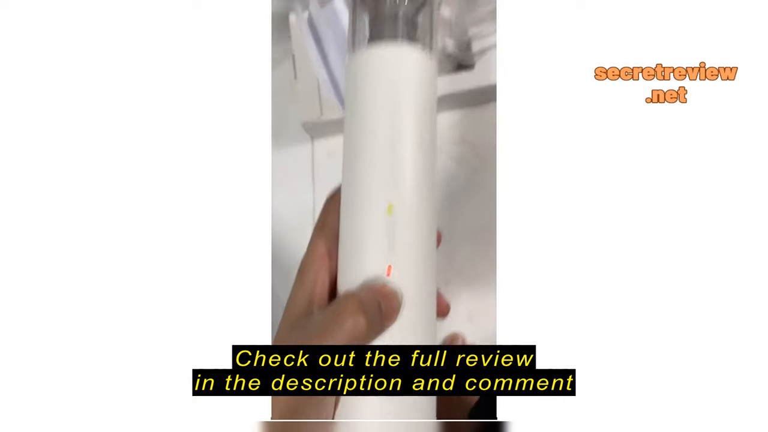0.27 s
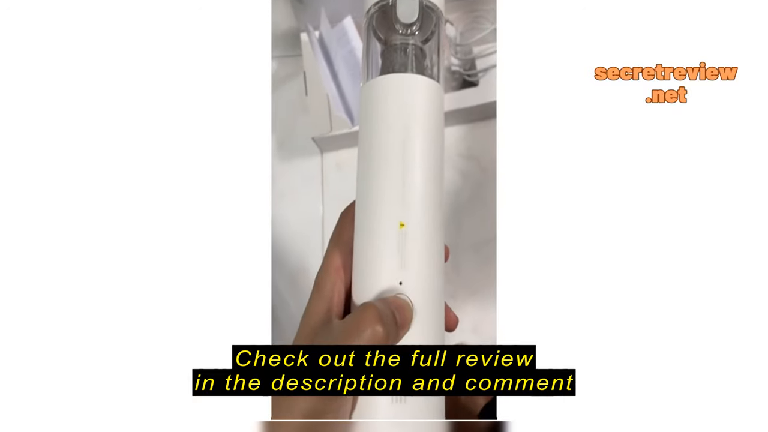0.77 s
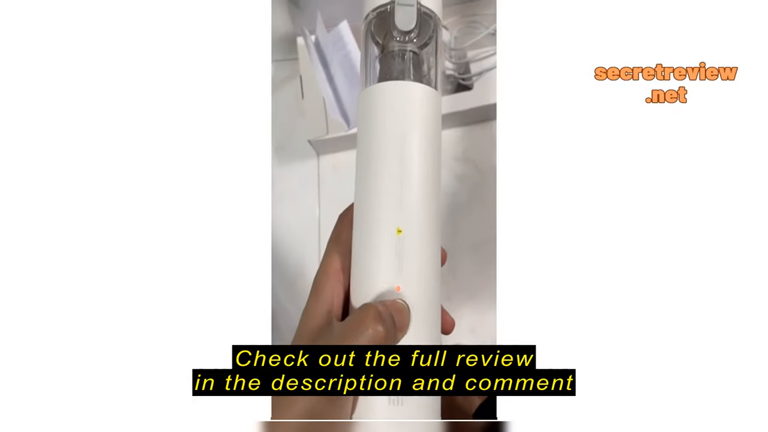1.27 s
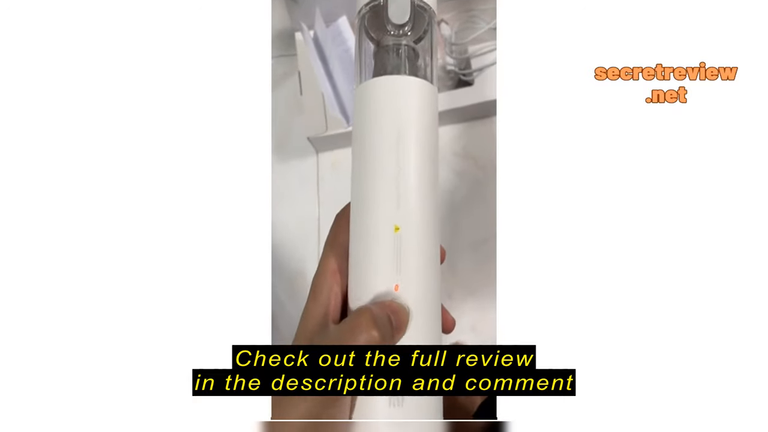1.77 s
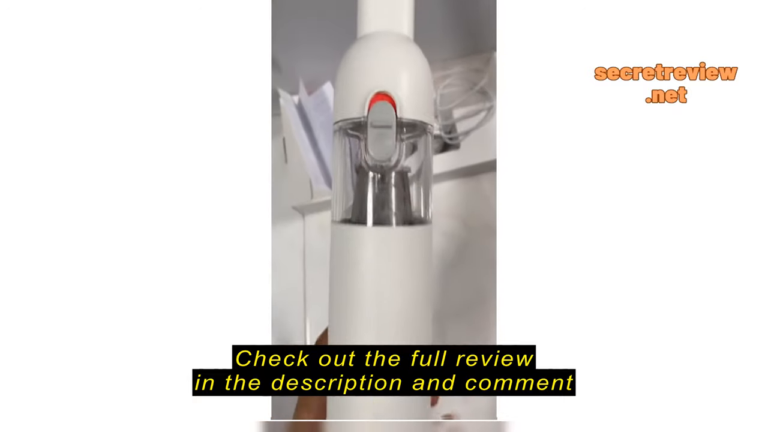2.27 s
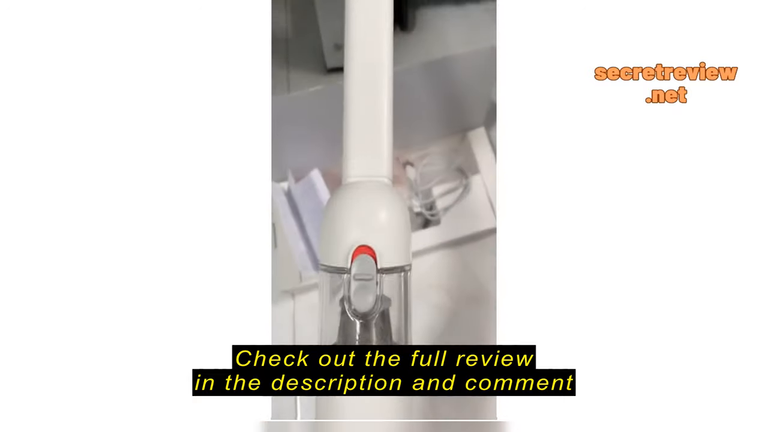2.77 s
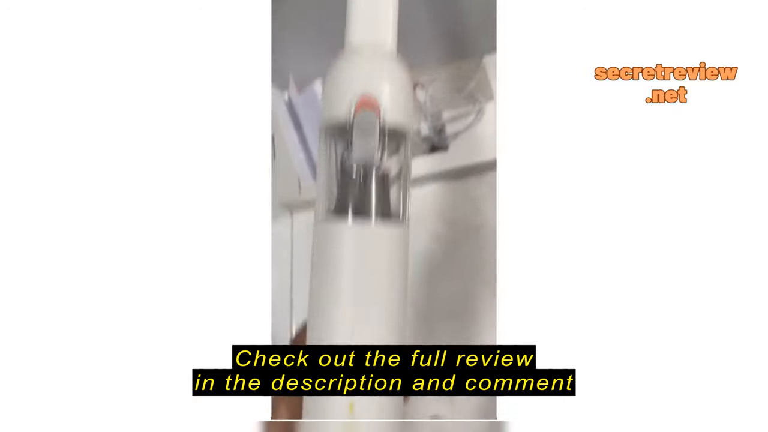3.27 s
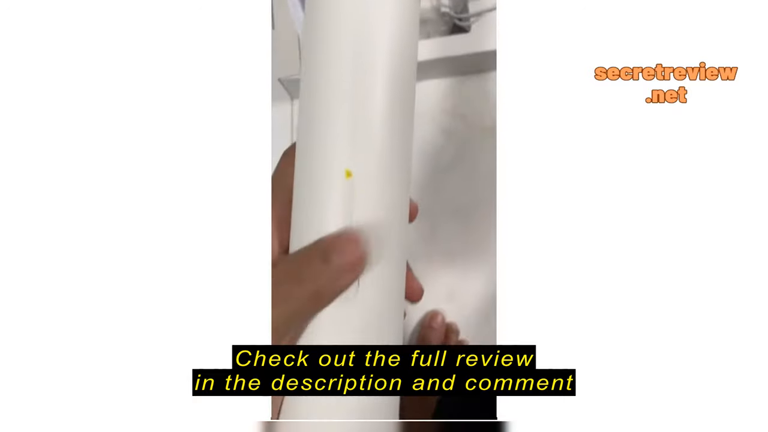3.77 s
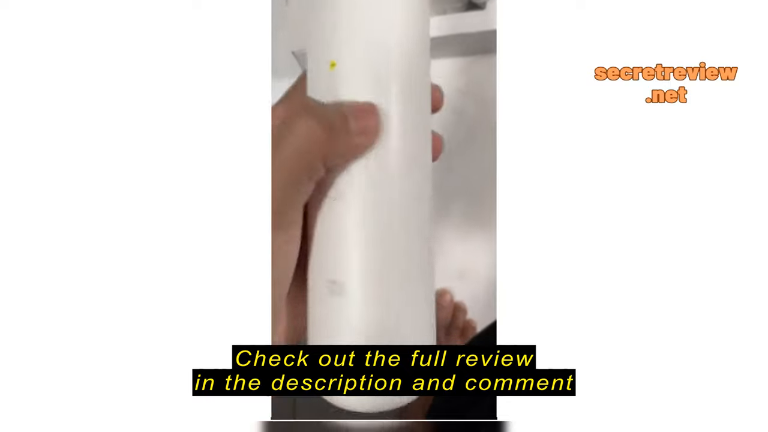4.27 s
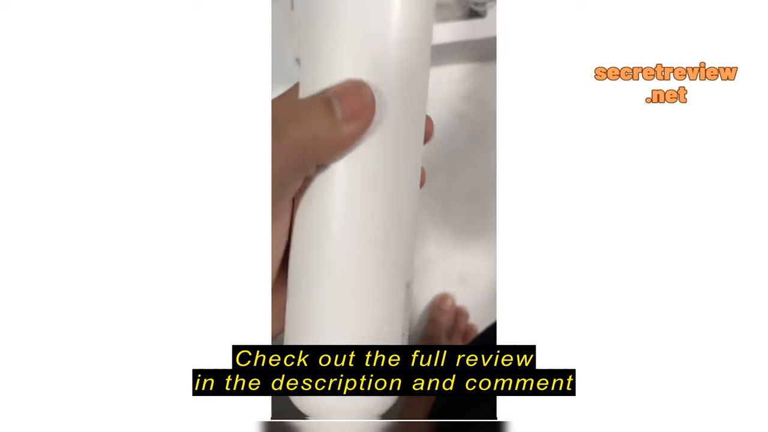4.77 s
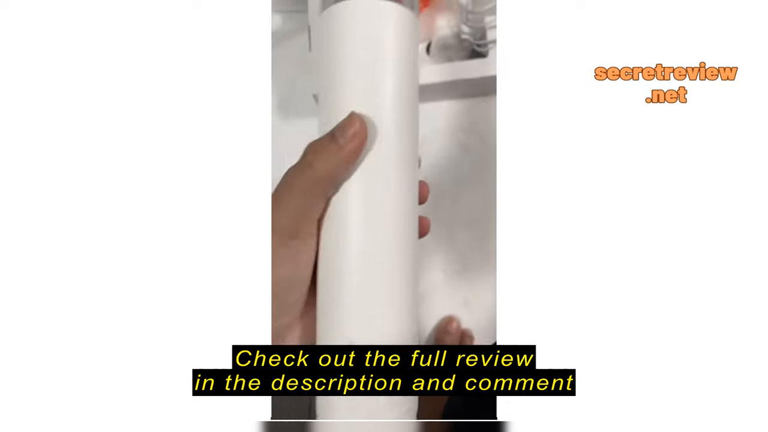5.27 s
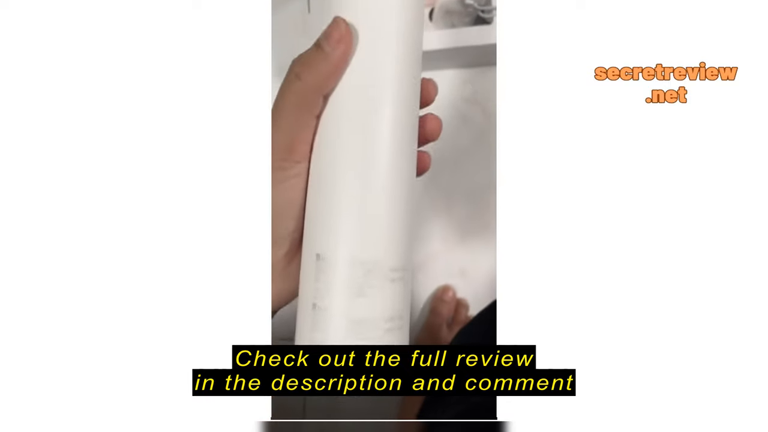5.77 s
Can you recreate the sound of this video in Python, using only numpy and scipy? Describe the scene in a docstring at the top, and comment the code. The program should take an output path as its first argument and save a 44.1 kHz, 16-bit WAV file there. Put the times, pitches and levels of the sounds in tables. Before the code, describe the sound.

A small cordless vacuum whirs up close, whines down and brakes to a clicking pause, then spins up again into a steady airy whine.

```python
"""A small cordless vacuum cleaner, held close in a quiet room, spins up: the hum sounds once a turn, nine blades
whine at nine times that rate, a bearing sings beside the second order and filtered noise rushes through the vents.
It coasts and brakes, all tones falling with the one shaft; in the pause the switch clicks twice, ringing its plastic.
It starts again with a shudder in its mount and runs on, settling to a lower cruising speed.
Later the hand shifts its grip with dull thuds, brings the tail end near and makes the vents hiss briefly."""
import sys
import numpy as np
from scipy import signal
from scipy.fft import rfft, irfft
from scipy.io import wavfile
from scipy.ndimage import uniform_filter1d

SR = 44100
rng = np.random.default_rng(int(sys.argv[2]) if len(sys.argv) > 2 else 0)


def output_pcm(signal):
    """Save a mono or channel-first signal as 16-bit PCM at the path in sys.argv[1].

    Samples are clipped to [-1, 1] before scaling.
    """
    pcm = np.clip(np.atleast_2d(signal).T, -1, 1) * 32767
    wavfile.write(sys.argv[1], SR, np.round(pcm).astype(np.int16))


N = 265834
HOP = 128  # samples between noise frames
TIME = np.arange(N) / SR
FRAMES = np.arange(N // HOP + 5) * HOP / SR  # frame times, s
BINS = np.fft.rfftfreq(4 * HOP, 1 / SR)  # frame frequencies, Hz
SPECTRUM_HZ = np.fft.rfftfreq(N, 1 / SR)
BLADES = 9
FULL_HZ = 900  # full speed, turns per second: the reference for levels


def amp(db):
    """Level definition: 20 dB is a factor of ten in amplitude."""
    return 10 ** (np.asarray(db) / 20)


def curve(rows, t, axis=1):
    """Linear interpolation: one column of a timed table, joined by straight lines."""
    rows = np.array(rows)
    return np.interp(t, rows[:, 0], rows[:, axis])


def read(points, hz):
    """Spectral envelope: values joined by straight lines over logarithmic frequency."""
    f, value = np.transpose(points)
    return np.interp(np.log(hz + 1), np.log(f), value)


def peak(hz, centre_hz, width_hz):
    """Simple resonance: gain 1 at its centre, 3 dB down at the edges of its width."""
    return 1 / np.hypot(1, 2 * (hz - centre_hz) / width_hz)


def lift(resonances, hz):
    """Resonance response: the decibels that a set of modes adds at a frequency."""
    return sum(db * peak(hz, centre, width) ** 2 for centre, width, db in resonances)


def drift(rate_hz):
    """Low-pass random fluctuation: slow chance of rms 1."""
    x = irfft(rfft(rng.standard_normal(N)) / (1 + (SPECTRUM_HZ / rate_hz) ** 2), N)
    return x / x.std()


def noise(density):
    """Time-varying spectral density: noise with this amplitude per root Hz, frames by bins."""
    z = rng.standard_normal((len(FRAMES), len(BINS), 2)) @ [1, 1j]
    scale = np.sqrt(SR * 3 / (8 * HOP))
    _, x = signal.istft(scale * (z * density).T, nperseg=4 * HOP, noverlap=3 * HOP)
    return x[:N]


def steady(gain_at):
    """Stationary spectral density: noise whose amplitude per root Hz is a function of frequency."""
    spectrum = rfft(rng.standard_normal(N)) * gain_at(SPECTRUM_HZ)
    return irfft(spectrum, N) * np.sqrt(SR / 2)


def swells(rows):
    """Gaussian envelope: a bell-shaped rise and fall for each row, its length one standard deviation."""
    return sum(amp(db) * np.exp(-((TIME - s) / length) ** 2 / 2) for s, length, db in rows)


def octaves(speed):
    """Logarithmic speed: doublings counted from full speed."""
    return np.log2(np.maximum(speed, 1) / FULL_HZ)


# the controller follows an S-shaped ramp, which it joins a little way up
RAMP_SHAPE, RAMP_LEAD_S = 1.9, .128


def ramp(start_s, length_s):
    """Stretched-exponential approach: an S-shaped rise from 0 to 1."""
    return 1 - np.exp(-(np.maximum(TIME - start_s, 0) / length_s) ** RAMP_SHAPE)


# time constants without power: slow when coasting, fast under the brake
COAST_S, BRAKE_S = .733, .078
# in a long run the speed settles to a lower cruising value
SAG_FROM_S, SAG_S, SAG_HZ = 2.88, .905, 65.7
# runs of the motor: switch-on t/s, top speed before sag f/Hz, ramp time t/s, power cut t/s, brake on t/s
MOTOR_RUNS = [(-.17, 939, .512, .877, 1.338), (1.77, 936, .5, np.inf, np.inf)]


def shaft_speed():
    """Exponential decay of rotation: runs ramp up, coast unpowered and brake; turns per second."""
    speed = -SAG_HZ * ramp(SAG_FROM_S, SAG_S)
    for on_s, top_hz, ramp_s, cut_s, brake_s in MOTOR_RUNS:
        slowing = np.maximum(TIME - cut_s, 0) / COAST_S + np.maximum(TIME - brake_s, 0) / BRAKE_S
        rise = top_hz * ramp(on_s - RAMP_LEAD_S, ramp_s)
        speed = speed + (TIME > on_s) * rise * np.exp(-slowing)
    return uniform_filter1d(speed, size=1600, mode="nearest")


RELAX_S = 0.19  # time for the air stream to relax or pick up again


def coasting():
    """First-order relaxation: 0 while the motor is powered, easing to 1 when it is not."""
    powered = sum(1.0 * (TIME > on_s) * (TIME < cut_s) for on_s, _, _, cut_s, _ in MOTOR_RUNS)
    step = 1 / (RELAX_S * SR)
    return signal.lfilter([step], [1, step - 1], 1 - powered)


STALL_HZ, STALL_STEEPNESS = 302, 3.43  # below this speed the fan hardly moves air
RUSH_AWAY_DB, RUSH_NEAR_DB = -0.52, 1.63  # stream gain with the tail end away and near
RUSH_DB_PER_OCTAVE, COAST_RUSH_DB = 3.5, -2.5  # growth per doubling of speed; change without power


def flow(speed, near):
    """Fan law with stall: the air stream sets in above the stall speed, then grows gently."""
    pumping = 1 / (1 + (STALL_HZ / np.maximum(speed, 1)) ** STALL_STEEPNESS)
    full_db = RUSH_AWAY_DB + near * (RUSH_NEAR_DB - RUSH_AWAY_DB)
    return pumping * amp(full_db + RUSH_DB_PER_OCTAVE * octaves(speed) + COAST_RUSH_DB * coasting())


# gain for a doubling of the speed; change of the weaker tones without power
HUM_DB_PER_OCTAVE, WHINE_DB_PER_OCTAVE, COAST_TONES_DB = 20.5, 16, -4
# hum as the hand turns the body, at full speed and off resonance: t/s, rms level/dB
HUM_TURNING = [(.6, -41), (2.28, -41.5), (3, -38), (3.4, -42), (3.8, -43), (4.68, -37), (5.1, -38),
               (5.39, -35.5), (5.85, -38.7), (6, -46)]
# whine likewise, more sharply beamed: t/s, rms level/dB
WHINE_TURNING = [(.17, -60.5), (.62, -58), (1.24, -63.6), (2.14, -56.5), (2.61, -62), (2.76, -68),
                 (3.75, -69.5), (4.09, -63), (4.29, -55), (4.75, -62.5), (5.25, -59), (5.72, -64),
                 (5.92, -59)]
# resonances of the body, swept by the hum: f/Hz, width/Hz, lift/dB
BODY_MODES = [(333, 80, 10), (447, 68, 12), (651, 55, 7), (731.6, 63, 11), (808, 15, 5.5), (848, 25, -1.5),
              (889, 50, 4)]
# resonances of the fan housing, swept by the whine: f/Hz, width/Hz, lift/dB
HOUSING_MODES = [(5550, 1090, 15.5), (6250, 250, 7), (6590, 230, -16), (7610, 230, 9.5), (8190, 585, 14.5)]
# weaker shaft and ball-bearing tones: multiple of the shaft speed
TONE_ORDERS = [2, 19 / 9, 3, 4, 44 / 9, 5, 6, 61 / 9, 7, 8, 79 / 9]
# one row per order, before flow and shell gain: rms level away/dB, rms level with tail end near/dB
TONE_LEVELS = [(-71, -70), (-71, -77), (-64.5, -81.5), (-72.5, -68), (-70, -81), (-82, -72), (-95, -94),
               (-76, -79), (-71.5, -77), (-74, -70), (-81, -85)]
# resonances of the plastic shell, cubed below: f/Hz, width before cubing/Hz, added part against the tone/dB
SHELL_MODES = [(1199, 82, 27.5), (1356, 115, 19), (1855, 112, 19), (2160, 63, -8), (2500, 86, 12),
               (2590.5, 78, 9.5), (5300, 350, 14)]
# as the body turns, it beams one tone or another at the listener: multiple of the shaft speed
BEAMED_ORDERS = [2, 2, 19 / 9, 19 / 9, 3, 4, 4]
# one row per beamed order: t/s, length/s, level of the added part against the tone/dB
BEAM_FLARES = [(2.8, 0.1, -6), (4.02, 0.14, 2), (0.69, 0.17, -1), (2.85, 0.31, -1.5), (4.08, 0.23, 6.5),
               (2.99, 0.3, 6.5), (5.88, 0.056, 6)]


def rotor(speed, near):
    """Order locking: all tones are tied to one shaft and flare as they sweep through resonances."""
    angle = 2 * np.pi * np.cumsum(speed * (1 + 0.000413 * drift(25))) / SR
    hum_db = curve(HUM_TURNING, TIME) + HUM_DB_PER_OCTAVE * octaves(speed) + lift(BODY_MODES, speed)
    out = amp(hum_db + 0.26 * drift(27)) * np.sin(angle)

    whine_db = curve(WHINE_TURNING, TIME) + WHINE_DB_PER_OCTAVE * octaves(speed)
    whine_db = whine_db + lift(HOUSING_MODES, BLADES * speed)
    # turbulence at the blade tips makes the whine flutter
    whine = amp(whine_db + 1.3 * drift(9.9)) * np.sin(BLADES * angle + 0.27 * drift(90))
    out += np.clip((speed - 380) / 180, 0, 1) * whine

    spinning = np.clip((speed - 330) / 160, 0, 1)  # the weaker tones need speed to sound
    drive = spinning * flow(speed, near) * amp(COAST_TONES_DB * coasting())
    for multiple, (away_db, near_db) in zip(TONE_ORDERS, TONE_LEVELS):
        tone_hz = multiple * speed
        shell = 1 + sum(amp(db) * peak(tone_hz, hz, width) ** 3 for hz, width, db in SHELL_MODES)
        flares = [row for beamed, row in zip(BEAMED_ORDERS, BEAM_FLARES) if beamed == multiple]
        beam = 1 + swells(flares)
        level = beam * amp(away_db + near * (near_db - away_db) + 2.93 * drift(2.2))
        # the bearing and the high orders only sing at high speed
        if multiple % 1 or multiple > 4:
            level = level * np.clip((speed - 700) / 100, 0, 1)
        out += drive * shell * level * np.sin(multiple * angle + 2 * np.pi * rng.random())
    return np.sqrt(2) * out  # rms to peak


HISS_DB_PER_OCTAVE = 15  # growth of the outlet hiss per doubling of speed
# rush with the tail end away, before flow, comb and duct: f/Hz, density level/dB per Hz
RUSH_AWAY_SPECTRUM = [(100, -94.5), (760, -88), (1250, -86.5), (1600, -88.5), (2200, -86), (3000, -85.5),
                      (3500, -96), (4200, -87.5), (5100, -94.5), (6300, -91.5), (9800, -101.8),
                      (12200, -109.4), (13800, -91), (15700, -92)]
# rush with the tail end near, likewise: f/Hz, density level/dB per Hz
RUSH_NEAR_SPECTRUM = [(100, -93), (760, -85), (1250, -83.5), (1600, -93), (2200, -87.5), (3000, -80),
                      (3500, -92), (4200, -96.5), (5100, -103), (6300, -93.5), (9800, -99.6),
                      (12200, -102.8), (13800, -95), (15700, -92.5)]
# how the cleaner is held: t/s, nearness of the tail end (0-1),
# outlet hiss at full speed before outlet and duct gain: level/dB per Hz
HOLDING_POSE = [(.1, .6, -81.5), (.8, 0.23, -82.5), (2.05, 0.52, -81.5), (2.95, 0, -84), (3.3, 0, -84),
                (4, 0.06, -86.5), (4.35, 0.31, -81.5), (4.75, 1, -85), (5.8, 0.93, -88)]
# resonances of the air duct and its slots: f/Hz, width/Hz, lift/dB
DUCT_MODES = [(309.5, 18, 6), (730, 230, 4), (2660, 67, -3.5), (5330, 260, 5), (7680, 140, 3.5),
              (8230, 410, 3), (10560, 270, 1.5), (14200, 600, -2.5)]


def air(speed, near, dull_db=22, patchy_db=0.97, outlet_hz=8050, outlet_width_hz=1650, outlet_db=-3,
        duct_db=-.5, echo=0.19, echo_s=0.000508):
    """Flow noise: a wide rush that dulls as the fan slows and an outlet hiss, both coloured by the duct."""
    controls = (speed, near, flow(speed, near))
    speed, near, strength = (np.interp(FRAMES, TIME, control)[:, None] for control in controls)
    slow = np.clip(1 - speed / FULL_HZ, 0, .7)
    colour_db = (1 - near) * read(RUSH_AWAY_SPECTRUM, BINS) + near * read(RUSH_NEAR_SPECTRUM, BINS)
    rush = strength * amp(colour_db - dull_db * slow * np.clip((BINS - 6500) / 3500, 0, 1))
    hiss_db = curve(HOLDING_POSE, FRAMES, axis=2)[:, None] + HISS_DB_PER_OCTAVE * octaves(speed)
    outlet = amp(hiss_db + outlet_db) / (1 + (2 * (BINS - outlet_hz) / outlet_width_hz) ** 6)
    # eddies make the stream patchy in time and frequency
    patches = uniform_filter1d(rng.standard_normal(rush.shape), size=70, axis=0)
    patches = uniform_filter1d(patches, size=4, axis=1)
    # the reflection off the moving hand combs the treble
    delay = echo_s * (1 + 0.15 * np.interp(FRAMES, TIME, drift(1.0)))[:, None]
    comb = 1 + echo * np.clip(BINS / 4000, 0, 1) * np.cos(2 * np.pi * BINS * delay)
    stream = noise(np.hypot(rush, outlet) * comb * amp(patchy_db * patches / patches.std()))
    duct = amp(duct_db + lift(DUCT_MODES, SPECTRUM_HZ))
    return irfft(rfft(stream) * duct, N) * amp(0.56 * drift(25))


# the hand passes over the vents: t/s, length/s, level before flutter/dB per Hz
HAND_OVER_VENTS = [(4.8, 0.28, -86.5)]


def vents(hiss_hz=5950, width_hz=1300):
    """Narrow-band jet noise: air squeezes past the fingers as they slide over the slots."""
    hiss = steady(lambda hz: peak(hz, hiss_hz, width_hz) ** 3)
    return swells(HAND_OVER_VENTS) * hiss * amp(1.6 * drift(11))


# the motor shudders in its mount as it starts and brakes: t/s, length/s, level/dB per Hz
MOUNT_SHUDDERS = [(.085, 0.056, -74.5), (1.35, 0.032, -80.5), (2.0, 0.06, -76.5)]


def shudder(mount_hz=470, width_hz=260):
    """Torque reaction: sudden torque shakes the motor mount in a short, rough, low burr."""
    return swells(MOUNT_SHUDDERS) * steady(lambda hz: peak(hz, mount_hz, width_hz) ** 2)


# snaps of the switch, in close pairs: t/s, peak level/dB, brightness/dB per octave
SWITCH_SNAPS = [(1.4715, -51, 2), (1.473, -54, 2), (1.7645, -56, 4), (1.766, -57, -2)]
# modes of the switch, before the brightness tilt: f/Hz, level/dB, t60/s
SWITCH_MODES = [(2550, 9, 0.007), (3040, -1, 0.0074), (3900, -2, .007), (5270, 0, .007), (5700, -2, 0.0064),
                (7800, -7, 0.0077), (8700, -11, .006)]


def switch(crack=.9, crack_s=.0007, crack_top_hz=7500):
    """Impulsive modal excitation: each snap is a brief wide crack that rings the same few plastic modes."""
    out = np.zeros(N)
    t = np.arange(SR // 20) / SR
    band = signal.butter(2, [900, crack_top_hz], "bandpass", fs=SR, output="sos")
    for s, db, tilt_db in SWITCH_SNAPS:
        ring = np.zeros(len(t))
        for hz, mode_db, t60 in SWITCH_MODES:
            decay = amp(mode_db + tilt_db * np.log2(hz / 4500) - 60 * t / t60)
            ring += decay * np.sin(2 * np.pi * (hz * t + rng.random()))
        snap = signal.sosfilt(band, rng.standard_normal(len(t)) * np.exp(-t / crack_s))
        tick = ring / abs(ring).max() + crack * snap / abs(snap).max()
        out[round(s * SR):][:len(t)] += amp(db) * tick / abs(tick).max()
    return out


# soft bumps of the shifting grip: t/s, length/s, level/dB per Hz
GRIP_BUMPS = [(4.53, 0.026, -79), (5, 0.079, -78), (5.39, 0.019, -66), (5.77, 0.063, -73)]


def grip(thud_hz=45, width_hz=65):
    """Low-frequency contact noise: dull thuds as the hand moves along the body."""
    return swells(GRIP_BUMPS) * steady(lambda hz: peak(hz, thud_hz, width_hz) ** 2)


# the quiet room: f/Hz, density level/dB per Hz
ROOM_SPECTRUM = [(10, -89.5), (30, -80.5), (60, -87), (110, -93), (220, -100), (550, -94.5), (800, -107),
                 (1150, -108), (1700, -117), (4500, -118), (6000, -123), (10000, -133), (16000, -136)]


def room():
    """Stationary background noise: the quiet room, strongest in the bass."""
    return steady(lambda hz: amp(read(ROOM_SPECTRUM, hz)))


def scene():
    """Mid-side superposition: the cleaner sits in the centre; mainly the highest hiss has a little width."""
    speed = shaft_speed()
    near = np.clip(curve(HOLDING_POSE, TIME), 0, 1)
    mid = rotor(speed, near) + air(speed, near) + vents() + shudder() + switch() + grip() + room()
    # gain of an independent air stream in the side signal: f/Hz, level/dB
    spread = [(3200, -74), (3700, -53), (5000, -19.5), (6200, -53), (8000, -47.0), (10500, 0),
              (13000, -9.0), (15500, -25)]
    side = irfft(rfft(air(speed, near)) * amp(read(spread, SPECTRUM_HZ)), N)
    return np.array([mid + side, mid - side])


EDGE_HZ = 15750  # upper band limit


def record(dry):
    """Linear-phase low-pass filtering: a steep band limit."""
    taps = signal.firwin(1023, EDGE_HZ, window=("kaiser", 9), fs=SR)
    return signal.oaconvolve(dry, taps[None], "same")


dry = scene()
out = record(dry)
output_pcm(out)
```